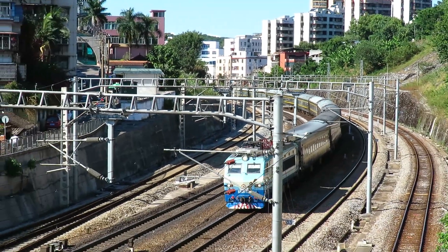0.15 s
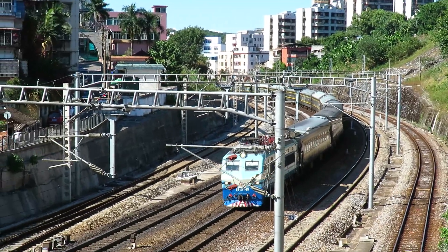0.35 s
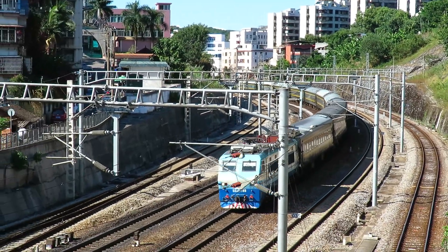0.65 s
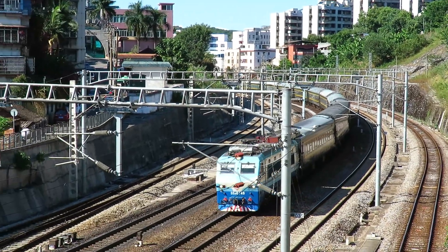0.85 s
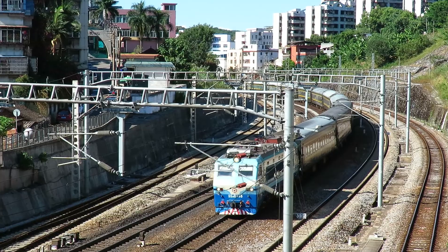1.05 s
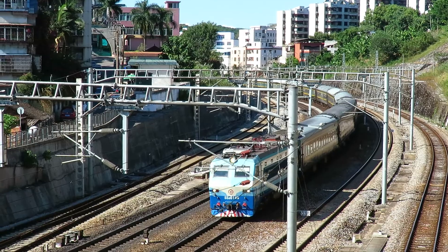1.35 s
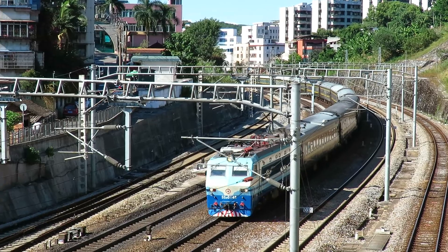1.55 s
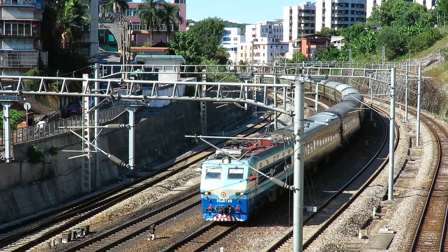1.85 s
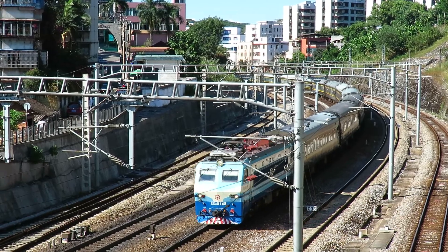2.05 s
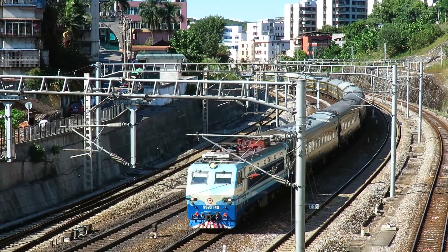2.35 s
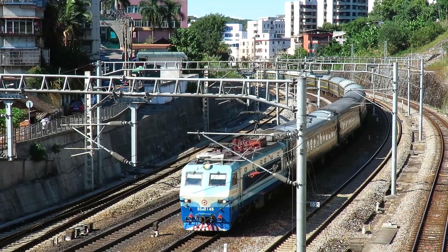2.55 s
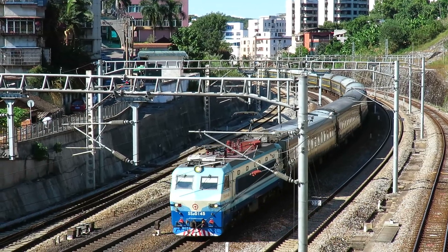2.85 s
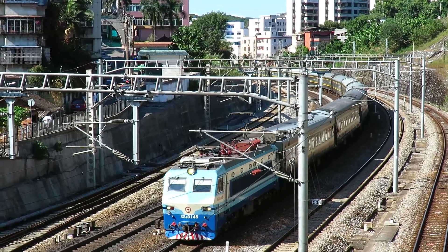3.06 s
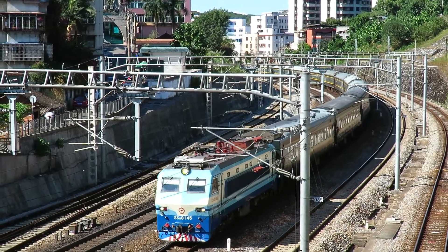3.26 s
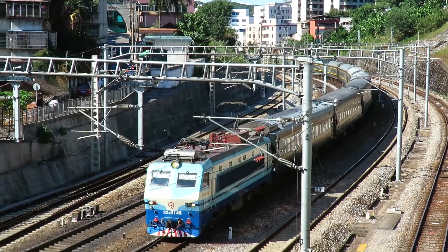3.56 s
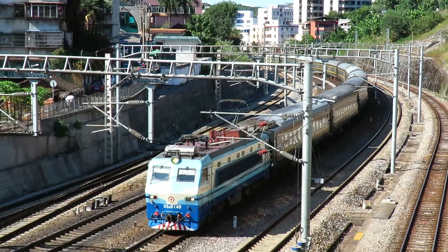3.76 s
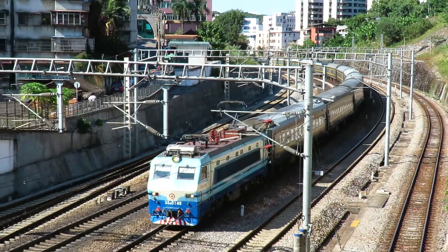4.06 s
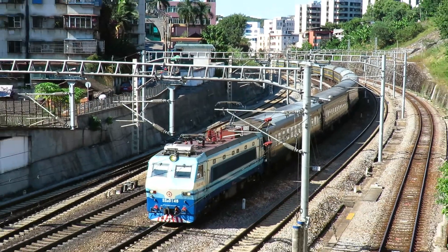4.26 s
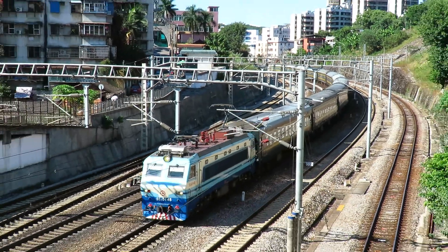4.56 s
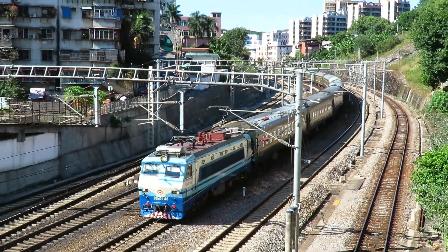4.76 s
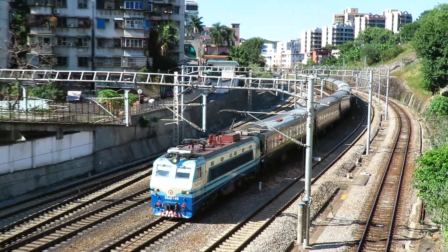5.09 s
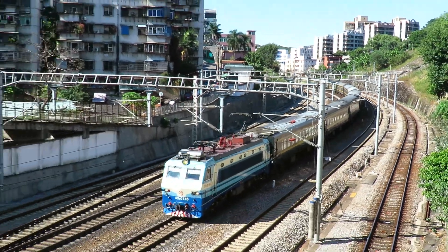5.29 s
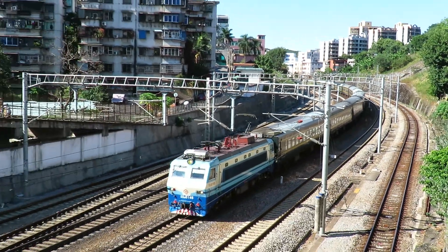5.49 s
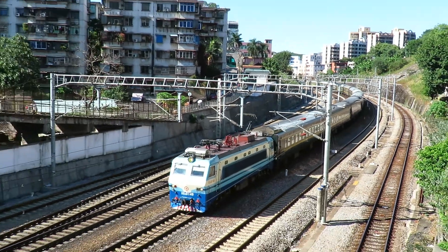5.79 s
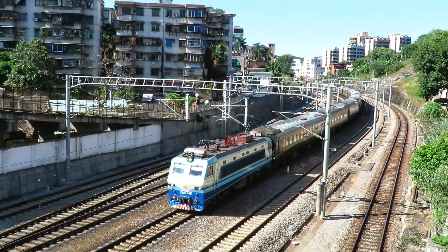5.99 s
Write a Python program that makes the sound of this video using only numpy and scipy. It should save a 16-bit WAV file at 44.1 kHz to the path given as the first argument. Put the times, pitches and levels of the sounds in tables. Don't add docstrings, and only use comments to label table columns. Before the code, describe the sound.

The sound starts mid-blast: an electric locomotive's air horn, loud and close, holds one reedy note a little above middle A flat, full of bright overtones with a slight flutter and rush of air. It sags very slightly in pitch, dips in brightness around 1.1 seconds, pushes again, and eases before stopping sharply at about 2.85 seconds. Its echo lingers off walls and houses, treble fading first, softly ringing for another second or more. From about 3.4 seconds automatic gain gradually brings up the train: a beating gear whine near 500 hertz, fan hum, low wheel rumble and grainy rail hiss, growing until about 5.7 seconds and then holding. Small dry clicks cluster at 4.5 to 4.6 seconds, with single ones near 5.65 and 6.1. A thin, very high flange hiss emerges after 4.7 seconds. Outdoor stereo, from a bridge over the cutting.

```python
import sys
import numpy as np
from scipy import signal
from scipy.fft import irfft, next_fast_len
from scipy.io import wavfile
from scipy.ndimage import uniform_filter1d

SR = 44100
rng = np.random.default_rng(int(sys.argv[2]) if len(sys.argv) > 2 else 0)


def undo_db(level):
    steps = np.asarray(level, float) / 20
    return 10 ** steps


def transcribe(signal):
    frames = np.atleast_2d(signal).T
    limited = np.clip(frames, -1, 1)
    pcm = np.round(limited * 32767).astype(np.int16)
    wavfile.write(sys.argv[1], SR, pcm)


N = 270333
HOP = 64
S = np.arange(N) / SR
T = np.arange(N // HOP + 2) * HOP / SR
SOUND_M_S = 343
AFTER = np.maximum(T - 2.85, 0)
BLOWN = np.exp(-AFTER / .045)
SCATTER_HZ = 5.65
HELD_DB = -55.5


def horn():
    # (time [s], fundamental [Hz])
    pitch = [
        (0, 418),
        (.5, 417.9),
        (1.4, 417.65),
        (2.4, 417.35),
        (2.8, 417.2),
        (3.1, 416.4),
        (4.4, 416.6),
    ]
    # (partial number, level [dB rms])
    bell = [(1, -25.5), (2, -20.5), (4, -24), (7, -30), (10, -37.5), (20, -54), (33, -61.5), (37, -77.5)]
    flutter_hz, flutter_db, flutter_bend = 38, -23, .04
    (hz,) = columns(pitch)
    phase = 2 * np.pi * np.cumsum(np.interp(S, T, hz)) / SR
    throb = 2 * np.pi * flutter_hz * T + .7 * waver(3.).real
    turn = tone = np.exp(1j * phase)
    mid = side = 0
    for k in range(1, 38):
        dull = 1 + (k * hz[0] / 5000) ** 2
        level = undo_db(on_log(bell, k))
        partial = low_partial if k <= 6 else high_partial
        paths, mean = partial(k, hz[0], level, dull)
        paths = paths + mean * 2 * undo_db(flutter_db) * BLOWN * np.cos(throb) * waver(6.4)
        bend = np.exp(1j * k * flutter_bend * BLOWN * np.sin(throb))
        smear = undo_db(-30) * waver(55 * min(k / 4, 1.5))
        paths = paths * bend + mean * smear
        side_db = -16.5 + 1.0 * np.log2(max(k / 4, 1))
        aside = mean * bend * waver(SCATTER_HZ * np.sqrt(k / 5)) * undo_db(side_db)
        mid = mid + play(paths, tone)
        side = side + play(aside, tone)
        tone = tone * turn
    return pair(mid, side, -2.14) * np.sqrt(2) + breath(phase)


def low_partial(k, hz, level, dull):
    reed_db = [-36, -23, -24, -24, -29, -30]
    # (extra path [m], opening speed [m/s], its change [m/s2],
    # level at partial 1 [dB], tilt [dB/octave])
    mirrors = [(3.003, 0.084, 0.065, 2.2, -5.5), (4.808, 0.109, -0.049, 2.3, -7.6),
               (5.977, 0.159, 0.096, -11.5, -1.0), (8.202, 0.168, 0.161, -23.8, 3.0),
               (9.392, 0.233, -0.088, -1.3, -7.2), (11.351, 0.434, 0.059, -15.7, -0.1),
               (12.507, 0.46, 0.031, -7.0, -6.8), (13.999, 0.615, -0.672, 5.3, -15.0),
               (16.041, 0.676, -0.161, -7.7, -5.6), (17.31, 0.815, 0.728, -25.6, 3.0),
               (19.126, 1.033, 0.802, 3.2, -13.7), (21.268, 1.065, 0.606, 3.2, -11.4),
               (22.707, 1.188, -0.758, 0.3, -10.8), (23.841, 1.252, 0.059, -2.0, -5.3),
               (25.978, 1.281, -0.073, -4.3, -8.7), (27.309, 1.456, -0.604, -29.8, 3.0),
               (29.514, 1.506, 1.277, 4.4, -14.8), (30.555, 1.599, 0.205, 0.5, -11.7),
               (32.648, 1.854, -0.447, 1.0, -12.5), (33.916, 2.756, 1.143, -5.4, -10.6)]
    path_s, wave_m = 1.4, SOUND_M_S / 417.5
    fall_s = 0.16
    paths = BLOWN
    for m, m_s, m_s2, db, tilt_db in mirrors:
        late = np.maximum(AFTER - m / SOUND_M_S, 0)
        mirrored = echo(m, m_s, m_s2, T - path_s, wave_m / k) * np.exp(-late * k / fall_s)
        paths = paths + undo_db(db + tilt_db * np.log2(k)) * mirrored
    near = np.exp(-AFTER * np.sqrt(k) / fall_s)
    far = undo_db(-11 - 60 * AFTER * dull / 4.56)
    mean = level * (near + far)
    loose = near * undo_db(-13) * waver(3.6 * k) + far * (1 - BLOWN) * waver(10.0 * np.sqrt(k))
    lag = np.exp(-7.1j / k)
    paths = undo_db(reed_db[k - 1]) * paths * lag + level * loose
    flat = np.exp(2j * np.pi * k * hz * (.97 - 1) * T)
    paths = paths + mean * undo_db(-21 - 4 * max(k - 4, 0)) * waver(9.) * flat
    return paths, mean


def high_partial(k, hz, level, dull):
    # (time [s], pressure [dB], brightness [dB/octave])
    air = [
        (0, 6, -0.5),
        (.15, 2.5, 1.5),
        (.7, 2, 0.5),
        (.95, 0.5, 1.4),
        (1.15, -3, 1.5),
        (1.4, 1.5, 1.7),
        (2, 1.5, 1.6),
        (2.5, -2, 2.1),
        (2.82, -2.5, 3.5),
    ]
    upper_db, bright_db = columns(air)
    near = undo_db(-60 * AFTER * dull / .55)
    far = undo_db(-13.5 - 60 * AFTER * dull / 4.45)
    full = level * undo_db(upper_db + bright_db * np.log2(k / 5))
    straight = 0.5 * BLOWN * np.exp(.02j * k ** 2)
    scattered = near * undo_db(-12) * waver(SCATTER_HZ * np.sqrt(k / 5))
    paths = full * (straight + scattered + far * waver(20.6))
    return paths, full * (near + far)


def breath(phase):
    # (frequency [Hz], level [dB per Hz])
    rush = [(300, -87), (800, -110.5), (1500, -92), (3000, -81), (6000, -81.5), (10000, -104),
            (15500, -116)]
    sag_db = 8.5 * np.maximum(T - 2.1, 0)
    puffs = 1 + 0.38 * np.cos(phase)
    return puffs * bands(rush, -3 - sag_db - 60 * AFTER / .4, 0, 1.5)


def train():
    roll_db = np.clip(HELD_DB + 11 * (T - 3.396), HELD_DB, -30)
    return rumble_and_fans(roll_db) + rail_hiss(roll_db) + gear_whine(roll_db)


def gear_whine(roll_db):
    # (multiple of the mesh rate, width [Hz], level [dB])
    teeth = [(1, 3, 0), (2, 4, -8), (3, 5, -15), (4, 5, -16), (5, 6, -22)]
    # (extra path [m], opening speed [m/s], its change [m/s2], level [dB])
    walls = [(2.324, -1.688, 0.061, -11.5), (7.234, -1.038, 0.435, 0.7), (11.784, -0.094, 0.621, -1.7),
             (16.657, 0.934, -0.138, -3.7), (21.657, 1.981, -0.108, -7.3), (26.349, 2.924, -0.428, -9.0),
             (30.918, 3.969, 1.227, -9.4)]
    mesh_hz, path_s = 499.7, 4.8
    paths = 1
    for m, m_s, m_s2, db in walls:
        paths = paths + undo_db(db) * echo(m, m_s, m_s2, T - path_s, SOUND_M_S / mesh_hz)
    drive_db = 6.5 - 8.5 * np.clip((3.24 - T) / 0.17, 0, 1)
    gear_db = roll_db + drive_db + 20 * np.log10(abs(paths))
    load_db = uniform_filter1d(gear_db, size=SR // HOP // 2)
    mesh = [(k * mesh_hz, width, db + (gear_db if k == 1 else load_db)) for k, width, db in teeth]
    flat = [(hz * .977, 2 * width, db - 4) for hz, width, db in mesh[:3]]
    return tones(mesh, -1.5, .85) + tones(flat, -2.5, .2)


def rumble_and_fans(roll_db):
    # (time [s], rumble over the rolling noise [dB])
    coaches = [(0, 13), (.08, 21.5), (.25, 13.5), (.75, 18), (1.45, 19), (1.55, 15), (1.95, 17.5), (2.3, 9),
               (2.58, 14), (2.65, 6.5), (3.3, 11), (3.38, 22), (3.72, 15.5), (4.4, 12.5), (5.4, 11),
               (5.7, 8.5), (6.08, 10.5), (6.13, 5)]
    # (frequency [Hz], level [dB per Hz])
    drumming = [(12, -74), (20, -25.5), (89, -2), (140, 0), (280, -2.5), (380, -9), (490, -16), (840, -120)]
    # (frequency [Hz], width [Hz], level [dB])
    fans = [(104.9, 8, -13.5), (150.3, 5.1, -7), (263.4, 19, -8.5), (403.7, 15.5, 2), (398.3, 20, -10.5),
            (822, 40, -7), (1215, 9.2, -15.5)]
    rumble_db = roll_db + columns(coaches)[0]
    facing_db = 3.5 * np.clip((T - 5.55) / 0.068, 0, 1)
    return bands(drumming, rumble_db - 22.5, 0, 0.51) + tones(fans, rumble_db - 4.0 + facing_db, 0.23)


def rail_hiss(roll_db):
    # (frequency [Hz], level [dB per Hz])
    rolling = [(300, -8.5), (450, -1), (900, 1.5), (2200, -10.5), (5000, -32), (9500, -44), (11000, -47.5),
               (15500, -90.5)]
    tilt_db = 2.37 - 0.0587 * (roll_db - HELD_DB)
    return bands(rolling, roll_db - 25, tilt_db, 1.5)


def flange():
    # (time [s], centre [Hz], level [dB])
    rub = [
        (3.4, 11500, -100),
        (3.58, 12000, -82),
        (3.75, 11500, -100),
        (4.55, 12600, -92),
        (4.7, 12500, -77),
        (5.2, 12100, -71),
        (5.65, 11600, -66),
        (5.78, 12500, -76),
        (6.13, 13300, -66),
    ]
    hz, db = columns(rub)
    tone = np.exp(2j * np.pi * np.cumsum(np.interp(S, T, hz)) / SR)
    size = int(SR / 900)
    grit = uniform_filter1d(rng.standard_normal((2, N)), size)
    grit = uniform_filter1d(grit, size) * np.sqrt(size)
    return play(undo_db(db + 7), grit * tone)


def ticks():
    # (time [s], peak [dB], frequency [Hz])
    clicks = [
        (3.5794, -72, 5010),
        (4.0494, -74, 5060),
        (4.4857, -51, 6130),
        (4.5094, -52.5, 5150),
        (4.5535, -48.5, 6330),
        (4.575, -44, 5000),
        (4.6079, -51, 6340),
        (5.6494, -51.5, 5320),
        (6.116, -50, 9030),
    ]
    out, t = np.zeros((2, N)), np.arange(600) / SR
    for s, db, hz in clicks:
        b, a = signal.butter(2, [0.71 * hz, 1.36 * hz], "band", fs=SR)
        burst = rng.standard_normal((2, len(t))) * np.exp(-t / 0.0033)
        start = int(s * SR)
        out[:, start:start + len(t)] += undo_db(db + 9.5) * signal.lfilter(b, a, burst)
    return out


def bands(spectrum, db, tilt_db, flicker_db):
    # (frequency [Hz], likeness [0 to 1])
    likeness = [(25, .85), (60, .35), (130, 0), (300, .1), (700, .86), (4400, .7), (8000, .2), (15000, 0)]
    size = next_fast_len(N)
    f = np.maximum(np.fft.rfftfreq(size, 1 / SR), 1)
    low, top = spectrum[0][0], spectrum[-1][0]
    colour = undo_db(on_log(spectrum, f))
    out = 0
    for hz in low * 2 ** np.arange(0, np.log2(top / low) + .3, .5):
        shape = np.cos(np.pi * np.clip(np.log2(f / hz), -.5, .5)) * colour * (f < top)
        chance = rng.standard_normal((2, len(f))) + 1j * rng.standard_normal((2, len(f)))
        mid, side = irfft(shape * chance, size)[:, :N] * np.sqrt(SR * size / 4)
        alike = np.clip(on_log(likeness, hz), 0, 1)
        gain = undo_db(db + tilt_db * max(np.log2(hz / 700), 0) + flicker_db * waver(19.0).real)
        mid, side = mid * np.sqrt((1 + alike) / 2), side * np.sqrt((1 - alike) / 2)
        out = out + play(gain, pair(mid, side, -1.5 * alike))
    return out


def tones(modes, level_db, steady):
    mid = side = 0
    for hz, width, db in modes:
        tone = np.sqrt(2) * np.exp(2j * np.pi * hz * S)
        gain = undo_db(db + level_db)
        direct = steady * np.exp(1j * waver(width / 2).real)
        mid = mid + play(gain * (direct + (1 - steady) * waver(width)), tone)
        side = side + play(gain * undo_db(-14.5) * waver(width), tone)
    return pair(mid, side, -2.3)


def echo(metres, m_s, m_s2, since, wave_m):
    return np.exp(-2j * np.pi * (metres + m_s * since + m_s2 * since ** 2 / 2) / wave_m)


def waver(rate):
    f = np.fft.fftfreq(len(T), HOP / SR)
    chance = [1, 1j] @ rng.standard_normal((2, len(f)))
    z = np.fft.ifft(np.exp(-(f / rate) ** 2) * chance)
    return z / np.sqrt(np.mean(abs(z) ** 2))


def play(gain, sound):
    return (np.interp(S, T, gain) * sound).real


def pair(mid, side, left_db):
    return np.array([(mid + side) * undo_db(left_db / 2), (mid - side) * undo_db(-left_db / 2)])


def columns(table):
    s, *rest = np.transpose(table)
    return [np.interp(T, s, c) for c in rest]


def on_log(table, x):
    a, b = np.transpose(table)
    return np.interp(np.log(x), np.log(a), b)


def scene():
    return horn() + train() + flange() + ticks()


def roll_off(x):
    return signal.sosfilt(signal.butter(12, 15420, fs=SR, output="sos"), x)


def record(dry):
    limited = np.tanh(.5 * dry) / .5
    return roll_off(limited)


dry = scene()
out = record(dry)
transcribe(out)
```